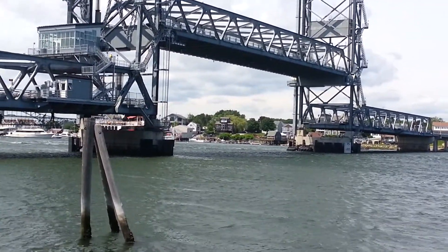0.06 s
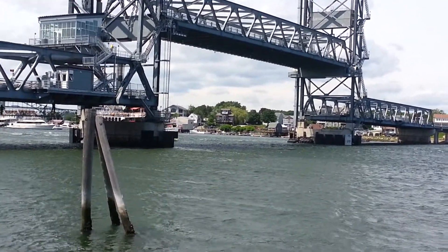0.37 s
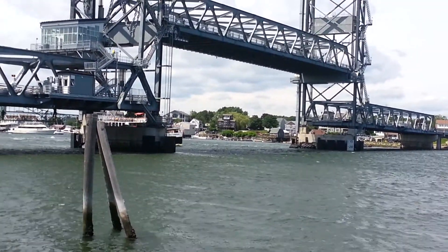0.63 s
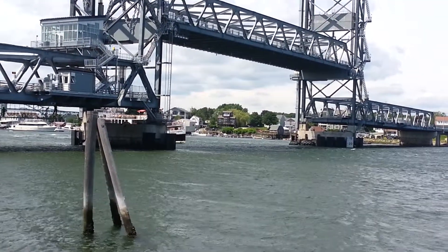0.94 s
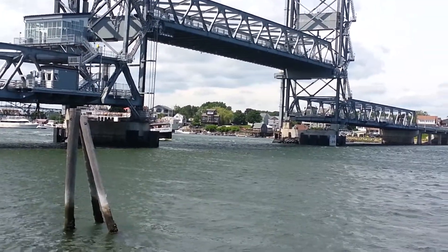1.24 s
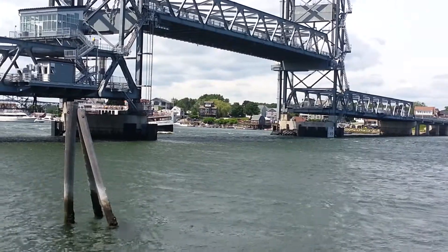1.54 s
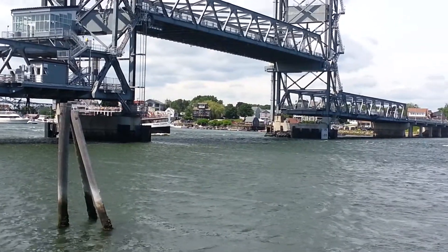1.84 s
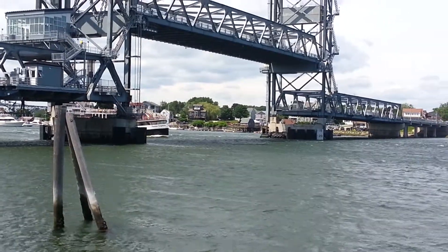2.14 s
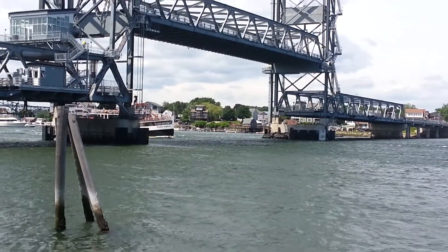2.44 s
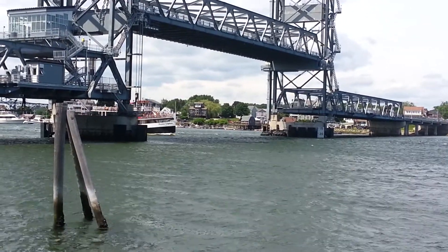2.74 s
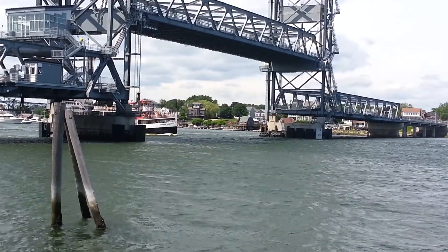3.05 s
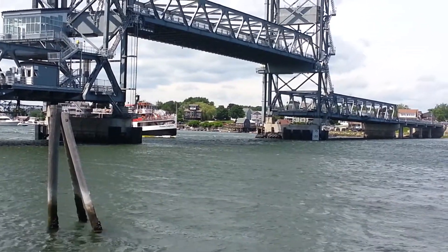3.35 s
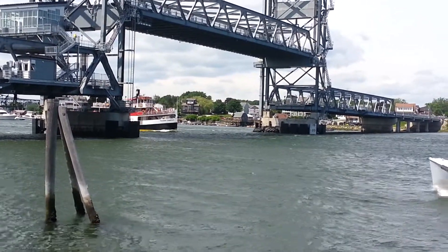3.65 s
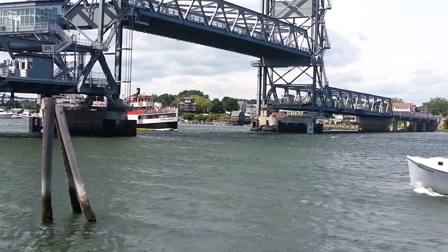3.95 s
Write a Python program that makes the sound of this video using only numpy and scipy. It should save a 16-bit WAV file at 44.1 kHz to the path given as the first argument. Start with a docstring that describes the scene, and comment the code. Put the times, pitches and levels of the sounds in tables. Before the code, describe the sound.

A diesel boat engine drones with a light metallic clatter and faint passing whines over open water. Gusts rumble on the microphone early on, drop away, then thump and tear at it heavily toward the end.

```python
"""A boat's six-cylinder diesel hums and clatters steadily across a river, by a steel lift bridge.
Its firings excite resonances of the block and a ringing steel part; thin gear whines come and go.
Turbulent gusts buffet the two microphone ports separately, briefly in the first second, then hard
towards the end. Behind it all lie a far rumble and the wash of wind and ripples."""
import sys
import numpy as np
from scipy import signal
from scipy.fft import rfft, irfft
from scipy.io import wavfile
from scipy.ndimage import map_coordinates

SR = 44100
rng = np.random.default_rng(int(sys.argv[2]) if len(sys.argv) > 2 else 0)


def inscribe(sig):
    """Save sig as 16-bit PCM at rate SR to the path in sys.argv[1].

    A 1-D sig is mono; a 2-D sig holds one channel per row.
    Samples are clipped to [-1, 1] before scaling.
    """
    pcm = np.round(np.clip(np.atleast_2d(sig).T, -1, 1) * 32767)
    wavfile.write(sys.argv[1], SR, pcm.astype(np.int16))


N = 176400

FIRING_HZ, SPEED_WOBBLE = 45.25, 0.00279
# Knock of each cylinder in firing order: level_db
CYLINDER_KNOCKS = [1.5, 1, 7.5, 0.5, 6.5, 7]
# Resonances of the block: pitch_hz, bandwidth_hz, left_db, right_db
BLOCK_MODES = [(1420, 850, -41, -41), (2025, 255, -41, -35), (2909, 68, -44.5, -42.5),
               (3090, 42, -51, -48.5), (3390, 120, -70, -51), (4940, 320, -55.5, -51),
               (5530, 910, -59, -50.5)]
# Partials of the exhaust hum: firing_multiple, level_db
EXHAUST_PARTIALS = [(2, -44), (3.68, -48.5), (5.08, -42), (11.5, -51), (15.17, -45.5)]
# Envelope of the engine: time_s, gain_db
ENGINE_ENVELOPE = [(0, 1), (1.65, 0.5), (2.1, 0.5), (2.7, 3), (3.2, -5.5), (3.45, -0.5), (3.65, -4),
                   (4, -2)]

def diesel():
    """Forced vibration: firings excite the block's modes; the exhaust hum follows the same speed."""
    firings = np.cumsum(FIRING_HZ * (1 + SPEED_WOBBLE * walk(1.63))) / SR
    strength = undb(CYLINDER_KNOCKS)[firings.astype(int) % len(CYLINDER_KNOCKS)]
    knock = strength * np.exp(-(firings % 1) / 0.56) + 0.405  # echoes leave a steady floor
    out = np.zeros((2, N))
    for hz, bandwidth_hz, *sides_db in BLOCK_MODES:
        direct = noise()
        for side, db in enumerate(sides_db):
            scattered = 0.16 * noise()  # from steel and water
            out[side] += undb(db) * resonate(knock * (direct + scattered), hz, bandwidth_hz)
    for multiple, db in EXHAUST_PARTIALS:
        amplitude = undb(db) * np.sqrt(2) * undb(2 * walk(1.8))
        out += amplitude * np.sin(2 * np.pi * (multiple * firings + rng.random()))
    out = out * undb(curve(ENGINE_ENVELOPE)) + steel_ring()
    lag_s = np.linspace(0.32, 0.18, N) / 1000  # the right port's delay shrinks as the microphone turns
    out[1] = map_coordinates(out[1], [(times() - lag_s) * SR], mode="mirror")
    return out


# Resonance of a loose steel part: pitch_hz, bandwidth_hz, left_db, right_db
STEEL_MODE = (2862, 49, -48, -40)
# Swells of its ringing: time_s, gain_db
STEEL_SWELLS = [(.08, 1), (.34, 0.5), (.62, 0), (1.05, -15), (1.28, -2), (1.54, 3), (1.68, 3), (1.92, 2),
                (2.45, 1), (2.68, 3), (2.88, 0), (3.53, 2), (3.93, 5)]

def steel_ring(jitter_s=0.0008, swell_s=0.037, pitch_waver=0.005):
    """Impact excitation: taps at the firing rate keep a steel part ringing; it wavers and swells."""
    t = times()
    hz, bandwidth_hz, *sides_db = STEEL_MODE
    beats_s = np.arange(0, t[-1], 1 / FIRING_HZ)
    timing, force = rng.standard_normal((len(beats_s), 2)).T
    taps = np.zeros(N)
    taps[np.clip((beats_s + jitter_s * timing) * SR, 0, N - 1).astype(int)] = undb(2 * force)
    swells = sum(undb(db) * np.exp(-((t - at) / swell_s) ** 2) for at, db in STEEL_SWELLS)
    envelope = 0.66 * undb(curve(ENGINE_ENVELOPE)) + swells
    warped_samples = np.cumsum(1 + pitch_waver * walk(10.06))
    ringing = map_coordinates(resonate(taps, hz, bandwidth_hz), [warped_samples], mode="mirror")
    return undb(sides_db)[:, None] * envelope * ringing


# Wind strength at each port: time_s, level_db
LEFT_GUSTS = [(0, -20), (.17, -35), (.5, -25.5), (.75, -21), (.85, -11.5), (.98, -20), (1.2, -29.5),
              (1.55, -27.5), (1.63, -25), (1.95, -32.5), (2.2, -31.5), (2.45, -21), (2.95, -22), (3.06, -9),
              (3.27, -9.5), (3.36, -9.5), (3.53, -13), (3.62, -11), (3.9, -9.5), (4, -20.5)]
RIGHT_GUSTS = [(0, -49), (.18, -30), (.24, -16), (.33, -27), (.47, -24.5), (.52, -17), (.62, -12.5),
               (.72, -21.5), (.83, -12), (.89, -32), (1.15, -44), (1.39, -22), (1.5, -36), (1.59, -20),
               (1.68, -34.5), (2.2, -34), (2.39, -23), (2.43, -14.5), (2.5, -17.5), (2.8, -13),
               (3.07, -10.5), (3.16, -25.5), (3.21, -9.5), (3.27, -43), (3.34, -11), (3.76, -10),
               (4, -18.5)]
# Brief lulls: time_s
LEFT_LULLS = [.87, .94, 1.015, 2.39, 3.174, 3.289]
RIGHT_LULLS = [2.505, 2.54, 2.699, 2.94, 3.003, 3.434, 3.562, 3.853, 3.92]
# Single eddies striking each port: time_s, strength_db
LEFT_EDDIES = [(0.266, -26), (0.613, -18), (0.742, -17.5), (0.831, -14), (0.899, -8), (0.961, -6.5),
               (1.674, -20), (2.274, -9.5), (2.732, -14), (3.062, -2), (3.129, -8), (3.206, -4),
               (3.229, -7), (3.589, -7), (3.766, -2.5), (3.933, -8.5)]
RIGHT_EDDIES = [(0.233, -11), (0.242, -12.5), (.51, -8), (.603, -17), (0.625, -11), (.657, -7.5),
                (0.784, -11.5), (0.814, -9.5), (0.846, -12.5), (1.334, -13.5), (1.603, -15), (2.279, -17),
                (2.421, -8), (2.56, -10), (2.594, -11.5), (2.747, -7.5), (2.776, -1.5), (2.826, -9),
                (2.864, -6), (2.911, -5), (2.974, -6.5), (3.035, -1.5), (3.055, -0.5), (3.204, -10.5),
                (3.331, -6.5), (3.459, -5), (3.47, -2), (3.539, -7), (3.597, -5.5), (3.746, -2),
                (3.79, -10.5), (3.817, -2)]
# Spectral density of the wind's rumble: frequency_hz, left_db, right_db
WIND_SPECTRUM = [(35.2, -40, -47), (75.7, -15, -8.5), (130, -1.5, -3), (218, 0.5, 2.5), (349, 2.5, 1),
                 (624, -5, -7), (1010, -27, -35), (1930, -41, -48), (6000, -72, -64)]
# Spectral density of strong wind's ripping: frequency_hz, density_db
RIP_SPECTRUM = [(100, -41), (300, -2.5), (500, -1), (900, -4.5), (1400, -15), (2200, -26), (4000, -40),
                (14000, -77)]
# Ripping relative to the rumble at STRONG_DB: left_db, right_db
RIP_BALANCE = [-13, -5]
STRONG_DB, RIP_GROWTH, BASS_GROWTH = -8, 0.75, 0.3812  # growths in dB per dB of wind

def wind(gusts, lulls, eddies, side):
    """Turbulent pressure at a port: weak flow rumbles deeply, strong flow rips, single eddies thump."""
    unevenness_db = 2 * np.minimum(walk(51.3), 1)  # eddies saturate: dips exceed peaks
    lull_db = -8 * sum(bell(at, 0.011) for at in lulls)
    db = curve(gusts) + unevenness_db + lull_db - 1
    rumble, rip = coloured(WIND_SPECTRUM, column=side + 1), coloured(RIP_SPECTRUM)
    bass = signal.sosfiltfilt(signal.butter(2, 198, fs=SR, output="sos"), rumble)
    mids = rumble - bass
    flutter_db = 5.5 * walk(210)
    rip_db = RIP_BALANCE[side] + np.minimum(RIP_GROWTH * (db - STRONG_DB), 0) + flutter_db
    out = undb(db) * (mids + undb(BASS_GROWTH * (STRONG_DB - db)) * bass + undb(rip_db) * rip)
    for at, strength_db in eddies:
        window = bell(at, 0.003)
        body = mids + undb(-BASS_GROWTH * strength_db) * bass  # weak eddies are the deepest
        rip_db = RIP_BALANCE[side] - 1 + RIP_GROWTH * (strength_db - STRONG_DB)
        eddy = window * (body + undb(rip_db) * rip)
        eddy *= np.sqrt(np.sum(window ** 2) / np.sum(eddy ** 2))
        out = out * (1 - window) + undb(strength_db + 4) * eddy
    return out


# Large eddies passing each port: time_s
LEFT_THUMPS = [0.74, 2.276, 2.441, 3.872]
RIGHT_THUMPS = [0.553, 0.818, 1.594, 2.312, 2.439, 3.68, 3.882]

def thumps(moments, width_s=0.0018, peak_db=-8):
    """Pressure pulse: a large eddy swings the pressure at a port once, heard as a deep thump."""
    pulses = sum((1 - ((times() - at) / width_s) ** 2) * bell(at, width_s) for at in moments)
    return undb(peak_db) * pulses


# Slaps on the overloaded right port: start_s, level_db
PORT_SLAPS = [(.611, -11), (.657, -8), (2.847, -3), (2.955, 9), (3.060, 2), (3.204, -2), (3.539, -2)]

def port_pops(pitch_hz=1250, decay_s=0.00045):
    """Damped oscillation: slapped by the hardest eddies, the port rings for about one cycle."""
    out = np.zeros(N)
    for start_s, db in PORT_SLAPS:
        age = np.maximum(times() - start_s, 0)
        out += undb(db) * np.exp(-age / decay_s) * np.sin(2 * np.pi * pitch_hz * age)
    return out


# Tones of the machinery: start_s, end_s, pitch_hz, left_db, right_db
GEAR_TONES = [(.41, 0.98, 4020, -43.5, -53.5), (.35, 1.2, 5500, -60, -46), (.6, 1.8, 5700, -73, -47.5),
              (3.45, 4.1, 4210, -55, -55)]

def gear_whines(sag_per_s=0.02, wobble=0.00215, fade_s=0.11):
    """Frequency and amplitude modulation: thin, rough tones flicker and sink as the gears slow."""
    out, t = np.zeros((2, N)), times()
    for start_s, end_s, pitch_hz, *sides_db in GEAR_TONES:
        hz = pitch_hz * (1 - sag_per_s * (t - start_s) + wobble * walk(90))
        fade = np.clip(np.minimum(t - start_s, end_s - t) / fade_s, 0, 1)
        flicker = unit(undb(4 * np.minimum(walk(14), 0.5)))
        out += undb(sides_db)[:, None] * fade * flicker * np.sin(2 * np.pi * np.cumsum(hz) / SR)
    return out


# Spectral density of distant engine and machinery: frequency_hz, density_db
FAR_SPECTRUM = [(25, -40), (50, -1), (90, 3), (200, 4), (350, -1), (480, -11.5), (700, 1), (1000, -9.5),
                (2000, -45), (5000, -61)]
# Level of that rumble: left_db, right_db
FAR_LEVELS = [-31.5, -29.5]
# Spectral density of wind and ripples: frequency_hz, left_db, right_db
WASH_SPECTRUM = [(298, -52, -14), (1030, -1.5, 3.5), (2280, -0.5, 3.5), (3700, -4.5, -2), (4240, -3.5, -2),
                 (5570, -8.5, -13), (7130, -16.5, -13), (8760, -17, -12), (9800, -32, -12.5),
                 (12860, -28.5, -25.5), (14300, -47, -65)]
# Base level of that wash: left_db, right_db
WASH_LEVELS = [-37, -32.5]
# Envelope of the wash: time_s, gain_db
WASH_ENVELOPE = [(0, 5), (.15, 2), (.46, 0.5), (.51, 3.5), (.76, 0), (1.02, -0.5), (1.29, 0.5), (1.36, 4),
                 (1.55, 1.5), (1.605, 5.5), (1.71, 2.5), (2.18, 2), (2.29, 9), (2.38, 2.5), (2.68, 1),
                 (2.77, 6.5), (2.88, -3), (3.24, -2.5), (3.3, 2.5), (3.45, -0.5), (3.62, -5), (3.8, -7),
                 (3.88, 2)]

def river():
    """Incoherent sources sum to broadband noise: a far rumble under a swelling hiss of wind and water."""
    swell = undb(curve(WASH_ENVELOPE) + 1.35 * walk(7.7))
    out = np.zeros((2, N))
    for side in range(2):
        out[side] += undb(FAR_LEVELS[side]) * coloured(FAR_SPECTRUM)
        out[side] += undb(WASH_LEVELS[side]) * swell * coloured(WASH_SPECTRUM, column=side + 1)
    return out


def undb(db):
    """Decibels to amplitude ratio."""
    return 10 ** (np.asarray(db) / 20)


def unit(x):
    """Normalisation to rms 1."""
    return x / np.sqrt(np.mean(x ** 2) + 1e-20)


def times():
    """Sample times in seconds."""
    return np.arange(N) / SR


def curve(rows):
    """Linear interpolation through rows of time_s, value."""
    return np.interp(times(), *np.array(rows, float).T)


def bell(at, width_s):
    """Gaussian window of height 1."""
    return np.exp(-((times() - at) / width_s) ** 2 / 2)


def noise():
    """Gaussian white noise."""
    return rng.standard_normal(N)


def walk(hz):
    """Low-pass noise of rms 1: a random drift at rates up to about hz."""
    f = np.arange(N // 2 + 1) * SR / N
    return unit(irfft(rfft(noise()) * np.exp(-(f / hz) ** 2), N))


def coloured(rows, column=1):
    """Spectral shaping: noise of rms 1 that follows one decibel column of a spectrum."""
    rows, f = np.array(rows, float), np.arange(N // 2 + 1) * SR / N
    db = np.interp(np.log(f + 1), np.log(rows[:, 0]), rows[:, column])
    return unit(irfft(rfft(noise()) * undb(db), N))


def resonate(x, hz, bandwidth_hz):
    """Steep resonance: two band-passes in cascade, scaled to rms 1."""
    b, a = signal.iirpeak(hz, hz / (bandwidth_hz * np.pi / 2), fs=SR)
    return unit(signal.lfilter(b, a, signal.lfilter(b, a, x)))


def scene():
    """Superposition: distant sources reach both ports, while each port has its own turbulence."""
    left = wind(LEFT_GUSTS, LEFT_LULLS, LEFT_EDDIES, side=0) + thumps(LEFT_THUMPS)
    right = wind(RIGHT_GUSTS, RIGHT_LULLS, RIGHT_EDDIES, side=1) + thumps(RIGHT_THUMPS) + port_pops()
    return diesel() + np.array([left, right]) + gear_whines() + river()


def record(dry, low_cut_hz=48, ceiling=1.1, top_hz=14000):
    """Band limiting and soft saturation: deep bass thins, loud peaks round off, the top is cut."""
    thin = signal.sosfilt(signal.butter(3, low_cut_hz, "high", fs=SR, output="sos"), dry)
    rounded = thin / (1 + (np.abs(thin) / ceiling) ** 6) ** (1 / 6)
    return signal.sosfilt(signal.ellip(8, 0.2, 70, top_hz, fs=SR, output="sos"), rounded)


dry = scene()
out = record(dry)
inscribe(out)
```